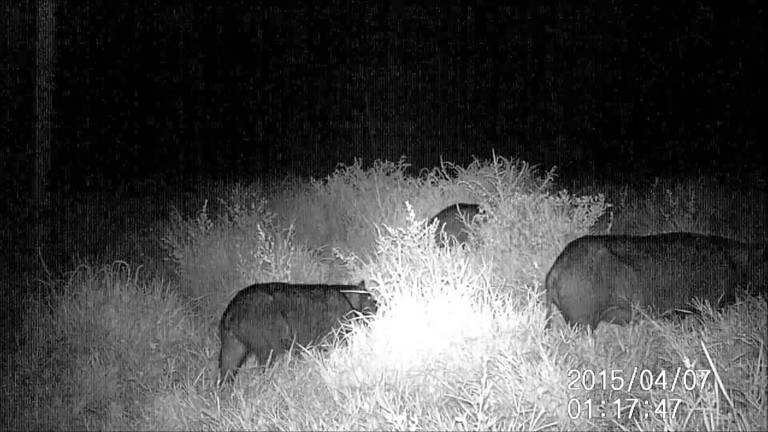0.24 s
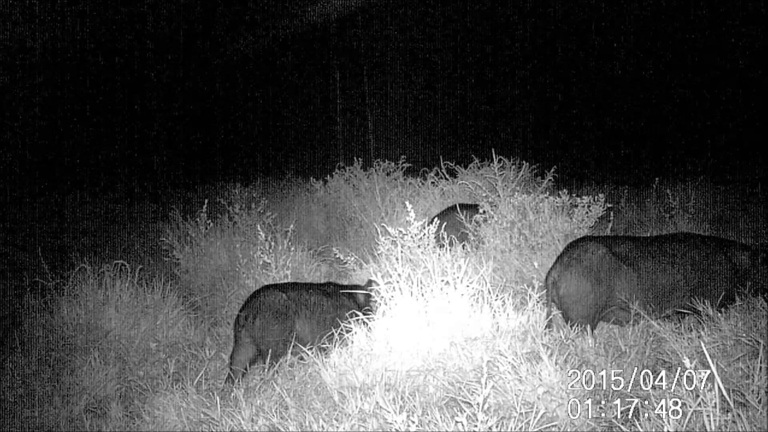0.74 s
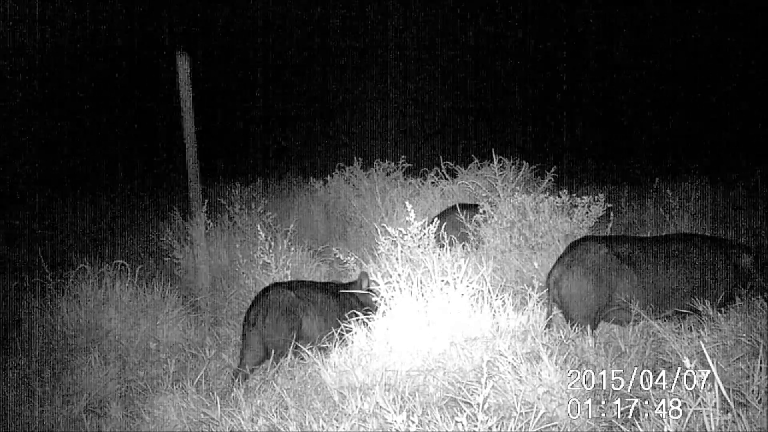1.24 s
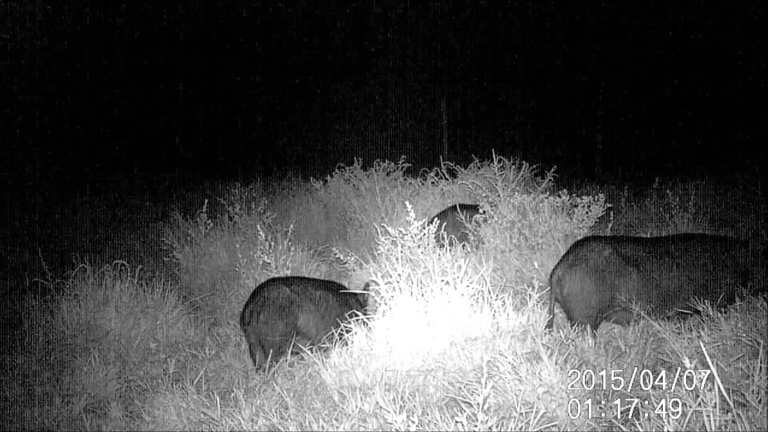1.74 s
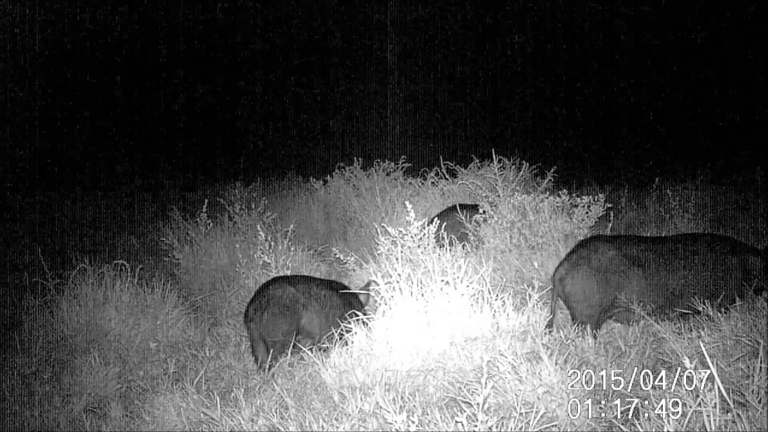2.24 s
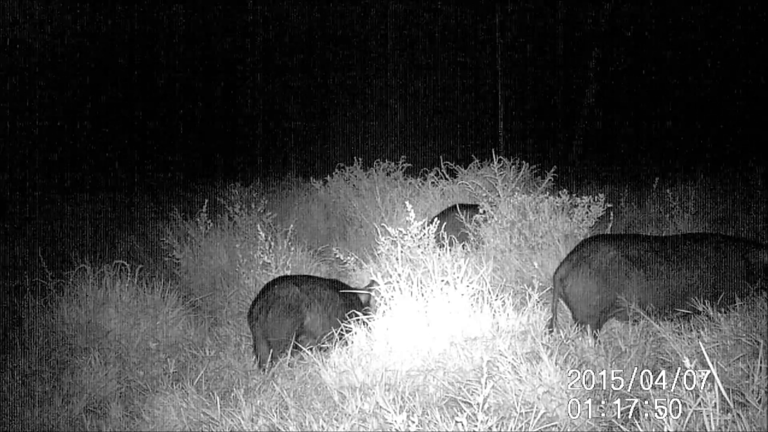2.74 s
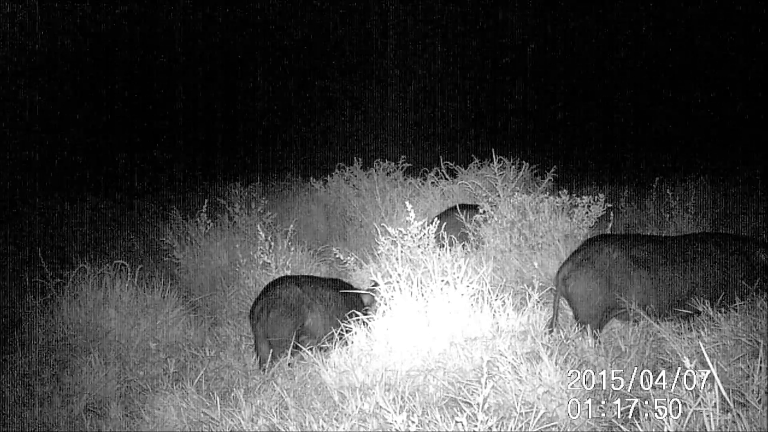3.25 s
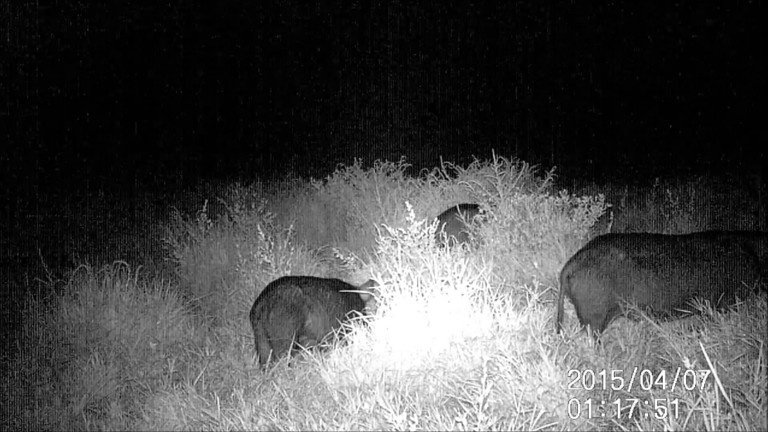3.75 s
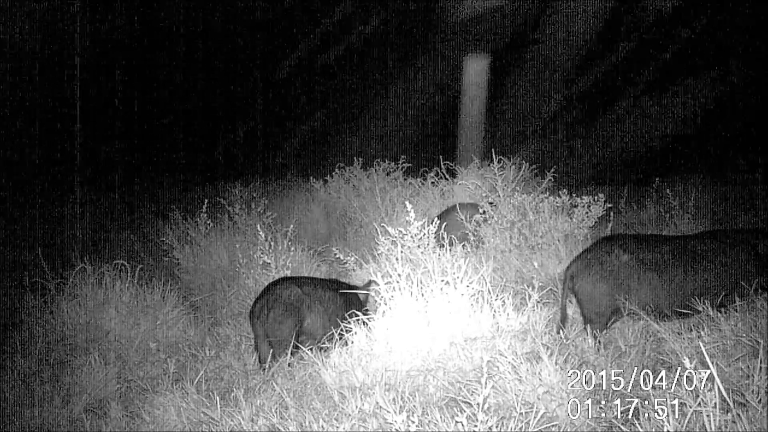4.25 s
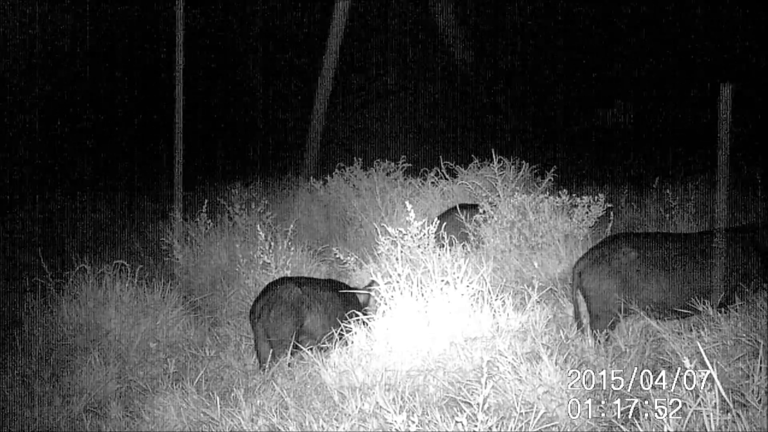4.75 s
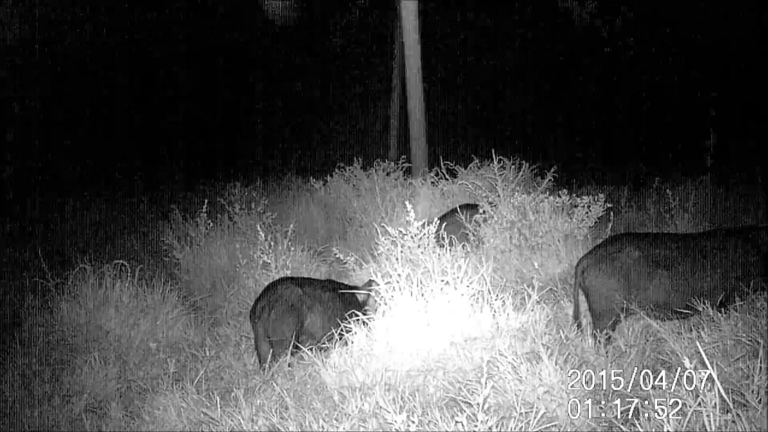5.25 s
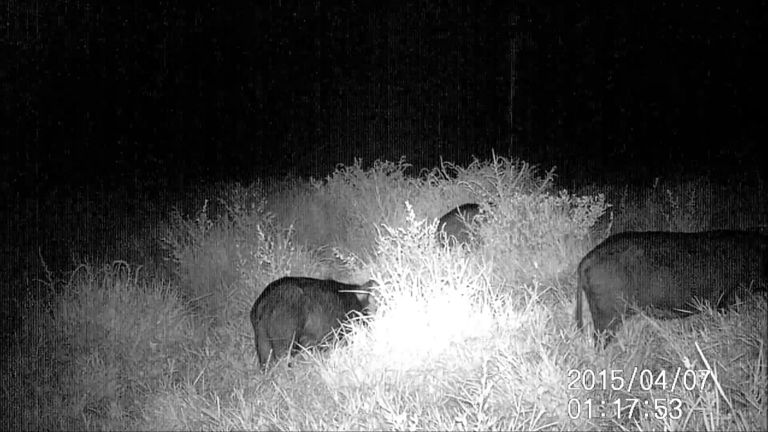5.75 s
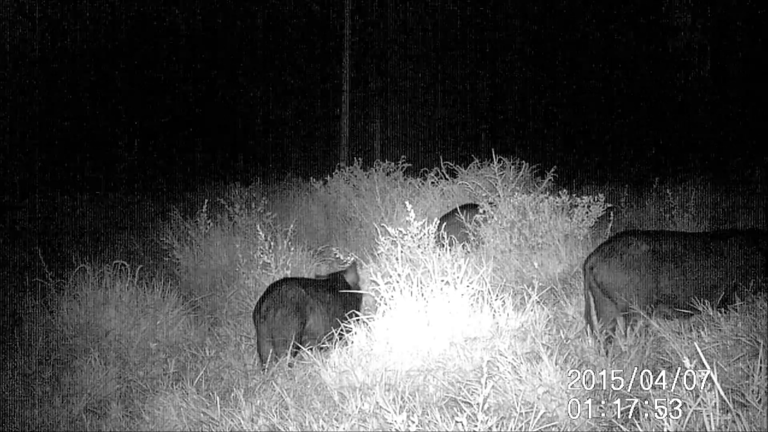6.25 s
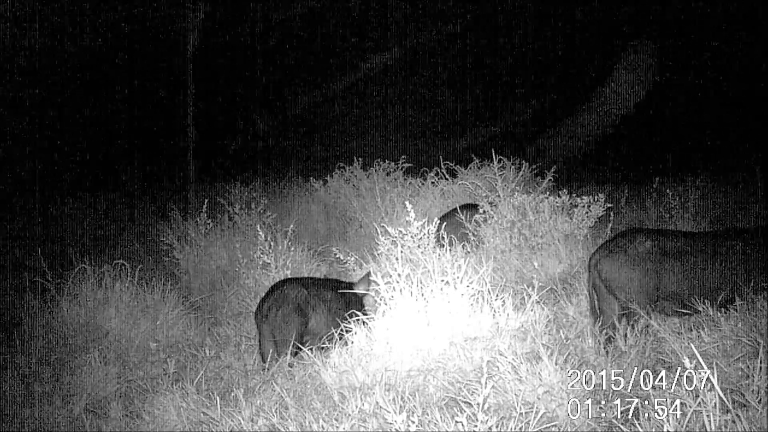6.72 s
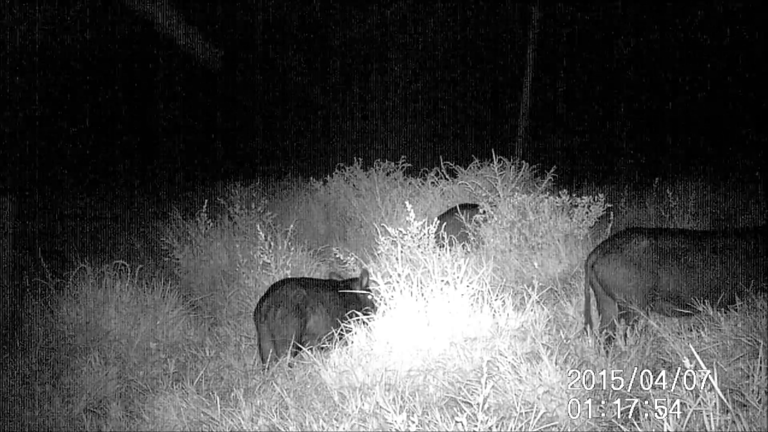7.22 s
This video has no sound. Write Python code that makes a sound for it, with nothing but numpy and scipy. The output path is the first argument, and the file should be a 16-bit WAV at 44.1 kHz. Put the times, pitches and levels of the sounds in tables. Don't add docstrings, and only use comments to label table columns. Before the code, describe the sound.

Rainy night in wet grass, heard through a small plastic housing with dull, narrow sound. Wind rumbles and rushes for 0.3 s, then a tiny silent gap and an abrupt change to a calmer scene. Soft rain hiss, faint plinks and high cricket trills around 3.5 kHz run throughout, the near cricket in short broken phrases. Stems snap and crunch in pigs' jaws, notably at 0.8, 2.3, 3.2, 3.6 and 5.3 s. Drops tick and knock on the shell, with heavy thumps at 1.24 and 1.54 s and a sharp tick at 3.83 s. A ragged 30 Hz buzz, light at first, gets clearly louder from 2.4 s and briefly stalls at about 3.7, 5.0 and 6.4 s. A big wet slap lands at 4.04 s amid crackling bites; a very hard hit comes at 6.43 s. Another firm drop follows at 7.3 s, then a faint bite.

```python
import sys
import numpy as np
from scipy import signal
from scipy.io import wavfile
from scipy.ndimage import uniform_filter1d

SR = 44100
rng = np.random.default_rng(int(sys.argv[2]) if len(sys.argv) > 2 else 0)


def generate_wav(sig):
    pcm = np.round(np.clip(np.atleast_2d(sig).T, -1, 1) * 32767).astype(np.int16)
    wavfile.write(sys.argv[1], SR, pcm)


def decibels_to_gain(level_db):
    exponent = np.asarray(level_db, float) / 20
    return 10 ** exponent


N = 329868

PORT_HZ = 3480


def in_time(rows):
    s, *columns = np.transpose(rows)
    return [np.interp(np.arange(N) / SR, s, c) for c in columns]


def rms_one(x):
    return x / np.sqrt(np.mean(x ** 2) + 1e-20)


def drift(rate_hz):
    r = np.exp(-80 * np.pi * rate_hz / SR)
    slow = signal.lfilter([1], [1, -2 * r, r * r], rng.standard_normal(N // 40 + 2002))[2000:]
    return np.interp(np.arange(N) / 40, np.arange(len(slow)), rms_one(slow))


def band(x, low_hz, high_hz):
    return signal.sosfilt(signal.butter(2, [low_hz, high_hz], "band", fs=SR, output="sos"), x)


def ring(clicks, hz, t60):
    r = decibels_to_gain(-60 / (t60 * SR))
    w = 2 * np.pi * hz / SR
    return signal.lfilter([0, np.sin(w)], [1, -2 * r * np.cos(w), r * r], clicks + 1e-18)


def add(out, s, piece):
    i = round(s * SR)
    out[i:i + len(piece)] += piece[:N - i]


def air():
    # [f/Hz, level per Hz/dB]
    colour = [(88, -38.5), (150, -12), (235, -5.5), (277, -3), (341, -8), (440, -7), (504, -8.5),
              (777, -12.5), (1670, -11.5), (2940, -9), (3570, -9), (3790, -8), (4150, -18.5), (5350, -32.5),
              (6960, -62), (11800, -120)]
    color_hz, color_db = np.transpose(colour)
    edges = 130 * 2 ** np.arange(0, 5.6, 1 / 3)
    together = drift(27)
    sizes = decibels_to_gain(2.3 * np.minimum(rng.exponential(1, N), 4))
    grains = (rng.random(N) < 260 / SR) * sizes * rng.choice([-1, 1], N)
    white = rng.standard_normal((2, N))
    out = 0
    for k, (low, high) in enumerate(zip(edges, edges[1:])):
        hz = np.sqrt(low * high)
        source = white[k % 2] + 0.77 * grains * min(hz / 2000, 1)
        level_db = np.interp(np.log(hz), np.log(color_hz), color_db)
        out = out + band(source, low, high) * decibels_to_gain(level_db + .6 * together + 1.2 * drift(15))
    return decibels_to_gain(-54) * rms_one(out)


def wind():
    # [t/s, level on the port/dB, level in the grass/dB]
    gusts = [
        (0, -49.5, -66),
        (.25, -48, -58),
        (.35, -66, -69),
        (.7, -66, -63),
        (1.2, -61, -71.5),
        (1.9, -65.5, -62.5),
        (2.4, -67, -74),
        (7.48, -61, -77),
    ]
    port_db, grass_db = in_time(gusts)
    rumble = band(rng.standard_normal(N), 14.0, 45)
    rush = band(rng.standard_normal(N), 460, 760)
    return decibels_to_gain(port_db) * rms_one(rumble) + decibels_to_gain(grass_db + 1.9 * drift(6.7)) * rms_one(rush)


def stalls(lead_s, width_s):
    first_s, every_s = 3.66, 1.36
    t = np.arange(N) / SR + lead_s - first_s
    since = t - every_s * np.maximum(np.round(t / every_s), 0)
    return np.exp(-(since / width_s) ** 4)


def buzz():
    # [t/s, frame sag level/dB]
    load = [
        (0, -65),
        (.1, -55.5),
        (1.05, -54),
        (1.16, -59),
        (2.27, -56.5),
        (2.4, -46.5),
        (7.48, -46.5),
    ]
    load_db, = in_time(load)
    stall_db = -13 * stalls(0, .049)
    busy_db = 4 * stalls(.1, .05)
    sag_db = load_db + stall_db
    stray_db = -56 + .6 * (load_db - load_db[-1] + stall_db) + busy_db
    frame_hz, frame_lead = 30.13, .02
    frame = (frame_hz * np.arange(N) / SR + frame_lead + 0.02 * drift(30)) % 1
    high = 1. * (frame < .63)
    strays_per_s = 40
    starts = 1. * (rng.random(N) < strays_per_s * decibels_to_gain(4 * drift(6)) / SR)
    pulses = np.minimum(uniform_filter1d(starts, size=160) * 160, 1)
    steps = pulses * (.6 - 1.62 * high)
    wave = decibels_to_gain(sag_db + 9) * (high - high.mean()) + decibels_to_gain(stray_db + 15) * (steps - steps.mean())
    return band(wave, 6.0, 320)


def patter():
    sizes = decibels_to_gain(3 * np.minimum(rng.exponential(1, N), 3)) * (rng.random(N) < 30 / SR)
    pitches = np.geomspace(1500, 2900, 8)
    dealt = rng.integers(0, 8, N)
    out = 0
    for k, hz in enumerate(pitches):
        out = out + ring(band(sizes * (dealt == k), hz, hz * 1.07), hz, 20.0 / hz)
    return decibels_to_gain(-56.5) * out


def strokes(times, levels_db, shift_hz):
    length_s, top_hz, fall_hz = .027, 3790, 360
    out, u = np.zeros(N), np.linspace(0, 1, round(length_s * SR))
    chances = rng.standard_normal((len(times), 4))
    for s, db, (late, tune, loud, turn) in zip(times, levels_db, chances):
        hz = top_hz + shift_hz + 30 * tune - fall_hz * u ** 1.5
        tone = np.sin(np.pi * u) ** 1.2 * np.sin(2 * np.pi * np.cumsum(hz) / SR + 10 * turn)
        add(out, max(s - length_s / 2 + .0015 * late, 0), decibels_to_gain(db + 0.63 * loud) * tone)
    return out * decibels_to_gain(2.0 * drift(100))


def crickets():
    # [t/s of the first, level/dB]
    leads = [
        (.358, -46),
        (2.1, -47),
        (4.081, -45),
        (5.963, -48.5),
    ]
    # [first stroke t/s, last stroke t/s]
    trills = [(.022, .168), (.533, .776), (.936, 1.071), (1.125, 1.401), (1.751, 1.781), (2.377, 2.595),
              (2.658, 2.797), (3.039, 3.321), (3.523, 3.869), (4.313, 4.697), (4.92, 5.305), (5.514, 5.757),
              (6.282, 6.385), (6.486, 6.591), (6.742, 7.065), (7.349, 7.453)]
    lead_gap_s, gap_s = .066, .0349
    rows = [(s + lead_gap_s * k, db) for s, db in leads for k in range(3)]
    for first, last in trills:
        count = round((last - first) / gap_s) + 1
        rows += [(s, -47.5) for s in np.linspace(first, last, count)]
    times, levels_db = np.transpose(rows)
    far = 0
    for k in range(-2, 3):
        far_times = np.arange(.007 * (k + 2), N / SR, gap_s * (1 + .035 * k))
        far = far + decibels_to_gain(2.0 * drift(3.1)) * strokes(far_times, 0 * far_times, 50 * k - 45)
    blur = band(rng.standard_normal(N), 3265, 3715)
    chorus = .66 * rms_one(far) + .66 * rms_one(blur)
    return strokes(times, levels_db + 2.9, 0) + decibels_to_gain(-51 + 1.0 * drift(3.0)) * chorus


def pushes():
    # [t/s, level/dB, width/ms]
    dents = [
        (1.2357, -22.5, 3.7),
        (1.5352, -26.5, 2.4),
        (3.939, -32, 1.6),
        (4.829, -26, 2.2),
        (6.142, -37.5, 1.8),
        (6.283, -32, 2.2),
    ]
    out, t = np.zeros(N), np.arange(1500) / SR
    for s, db, ms in dents:
        u = t * 1000 / ms - 1.5
        dent = -np.exp(-u ** 2 * 6)
        add(out, s - 0.001136 * ms, decibels_to_gain(db) * band(dent, 140, 660))
    return out


def knocks():
    # [t/s, level/dB, f/Hz]
    thuds = [(1.167, -46.5, 1040), (1.2355, -34, 573), (1.534, -27, 953), (2.8056, -32, 1270),
             (3.834, -46, 1310), (3.933, -52, 500), (4.034, -46, 977), (4.094, -37.5, 690),
             (6.141, -47, 484), (6.284, -41, 934), (6.312, -36.5, 1120), (6.4346, -35, 1000),
             (6.636, -45, 532), (7.32, -50, 450), (7.468, -41, 760)]
    out, t = np.zeros(N), np.arange(1200) / SR
    for s, db, hz in thuds:
        t60 = .018 * (hz / 1000) ** 2.5
        blow = np.exp(-t / 0.0001) + 0.082 * rng.standard_normal(len(t)) * np.exp(-t / 0.0015)
        sound = band(ring(blow, hz, max(t60, .003)) + 3 * blow, 260, 1800)
        add(out, s, decibels_to_gain(db) * sound / abs(sound).max())
    return out


def slap():
    # [f/Hz, level/dB, fade by 60 dB/s]
    shell = [(4030, 0.5, 0.0088), (4500, -6.5, 0.0095), (3330, -7.5, 0.0035), (3020, -33.5, 0.049),
             (2040, -18.5, 0.048), (1640, -39.5, 0.048), (2400, -32, 0.027)]
    out, t = np.zeros(N), np.arange(1500) / SR
    port = (3620, -4, .045)
    modes = sum(decibels_to_gain(db) * ring(1. * (t == 0), hz, t60) for hz, db, t60 in shell + [port])
    contact_s = .0064
    damped = modes * (.12 + .88 / (1 + (t / contact_s) ** 12))
    spatter = decibels_to_gain(-17) * rng.standard_normal(len(t)) * np.exp(-t / .005)
    sound = band(damped + spatter, 1800, 4900)
    add(out, 4.0437, -decibels_to_gain(2.5) * sound / sound[abs(sound).argmax()])
    return out


def crunches():
    # [t/s, length/s, level/dB, f/Hz]
    bites = [
        (0.787, 0.063, -40.5, 2140),
        (2.277, 0.026, -43, 1930),
        (3.202, 0.027, -46.5, 2170),
        (3.582, .06, -51, 1980),
        (3.8, 0.028, -46, 2500),
        (4.0273, 0.013, -32, 2900),
        (4.049, 0.0078, -35, 1690),
        (5.228, 0.042, -49.5, 1900),
        (7.432, 0.024, -50, 1930),
        (6.06, 0.022, -45, 1900),
    ]
    out, t = np.zeros(N), np.arange(4000) / SR
    for s, length, db, hz in bites:
        draw, size = rng.random(4000), rng.standard_normal(4000)
        swell = np.sin(np.pi * np.clip(t / length, 0, 1)) ** 2
        grains = size * (draw < 5000 / SR) * swell
        mouth = .7 * ring(grains, .84 * hz, .01) - ring(grains, hz, .012) + .7 * ring(grains, 1.17 * hz, .008)
        sound = band(mouth + .7 * ring(grains, PORT_HZ, .008), hz / 1.5, 4500)
        add(out, s, decibels_to_gain(db) * rms_one(sound) * np.sqrt(length * SR / 8000))
    return out


def contacts():
    # [t/s, port f/Hz, port level/dB, shell level/dB, crack level/dB]
    drops = [(1.161, 3460, -33, -33, -42), (1.2354, 3460, -23, -21.5, -28.5),
             (1.5352, 3740, -25, -20.5, -36), (1.6335, 3570, -24, -46, -37), (1.641, 3330, -31, -43, -43),
             (1.888, 3220, -28, -38, -34.5), (2.803, 3130, -24, -35, -37.5), (3.2784, 3700, -30, -36, -45),
             (3.8318, 3480, -17.5, -25.5, -22.5), (3.9324, 3430, -36.5, -45, -45),
             (4.0336, 3290, -33, -38, -47), (4.0831, 3500, -25, -45, -51), (4.0939, 3580, -23, -25, -39),
             (4.2381, 3540, -22, -35, -43), (4.8733, 3610, -26, -51, -50),
             (5.0043, 3760, -37.5, -48, -38.5), (5.2364, 3380, -31.5, -54, -42),
             (5.303, 3360, -25, -43, -41.5), (6.1409, 3440, -23.5, -31.5, -31.5),
             (6.2817, 3380, -21.5, -26, -40.5), (6.313, 3570, -31, -24, -33),
             (6.4343, 3400, -14.5, -20.5, -14.5), (6.6367, 3150, -28, -34.5, -42.5),
             (7.3184, 3320, -22.5, -23, -29.5)]
    # [t/s, stem f/Hz, stem level/dB, port level/dB]
    snaps = [(.2524, 2380, -44, -60), (.275, 2390, -44, -47), (0.8157, 1850, -27, -31),
             (0.8226, 2080, -28, -30), (.9033, 2220, -39.5, -41), (1.0112, 2050, -36.5, -50),
             (1.167, 2750, -36, -37), (1.899, 1530, -43.5, -39), (1.9683, 1870, -43.5, -42),
             (2.2841, 1860, -32.5, -30.5), (2.788, 2230, -37.5, -43), (2.8343, 2300, -38.5, -42),
             (2.8444, 1550, -33.5, -39), (3.148, 2690, -41, -44), (3.1987, 2700, -31.5, -39),
             (3.591, 2010, -32, -37), (3.6056, 2700, -35, -50), (3.82, 2720, -40, -56),
             (4.0243, 2570, -38, -34), (4.0887, 2620, -38, -31), (4.329, 1820, -43, -64),
             (4.6616, 2680, -41, -38), (5.253, 1700, -39, -41.5), (5.322, 2270, -40, -40),
             (5.3605, 2000, -32, -33), (5.7301, 1940, -36.5, -49), (5.906, 2350, -37, -45),
             (6.256, 2800, -37.5, -34), (6.268, 2650, -41.5, -54), (6.516, 1540, -42, -40.5)]
    # [t/s, port level/dB]
    drips = [(.1768, -33.5), (.6129, -39), (.7954, -32), (.835, -32.5), (.9953, -36), (1.2493, -39),
             (1.376, -39), (1.4782, -34), (2.2146, -37), (2.3541, -37), (2.6234, -37.5), (2.7948, -35),
             (2.822, -35), (3.0048, -36), (3.359, -41), (3.5973, -34), (3.619, -38), (3.6569, -34.5),
             (3.8027, -36), (5.1183, -38.5), (5.7256, -32.5), (6.0724, -31), (6.1986, -34.5), (6.4968, -39),
             (6.8387, -37.5), (6.9633, -39), (7.1934, -40.5)]
    wall_hz, drip_hz = 2580, 2100
    rows = [(s, hz, port_db, wall_hz, wall_db, crack_db) for s, hz, port_db, wall_db, crack_db in drops]
    for s, hz, db, port_db in snaps:
        rows.append((s, PORT_HZ + 120 * rng.normal(), port_db, hz, db, db - 18))
    for s, db in drips:
        port_hz = PORT_HZ + 120 * rng.normal()
        rows.append((s, port_hz, db, drip_hz * rng.uniform(.75, 1.25), db - 9.5, db - 16))
    return rows


def ticks():
    out, t = np.zeros(N), np.arange(1200) / SR
    spike = band(1. * (np.arange(len(t)) == round(.0004 * SR)), 1100, 5000)
    for s, port_hz, port_db, body_hz, body_db, crack_db in contacts():
        hard = np.clip((crack_db + 52) / 18, 0, 1)
        splatter_s = .0022 - .0013 * hard
        fade = .5 * np.exp(-t / splatter_s) + .04 * np.exp(-t / .004)
        blows = rng.standard_normal((3, len(t))) * fade
        blows[:, 0] = .3 + hard
        blows[0] += .24 * hard * np.roll(blows[0], round(.0045 * SR))
        port = band(ring(blows[0], port_hz, .0044) + 2.0 * blows[0], 2760, 3770)
        body = ring(blows[1], body_hz, 7.7 / body_hz) + 1.2 * blows[1]
        body = band(body, body_hz / 1.4, body_hz * 1.3)
        crack = band(blows[2], 3850, 4810)
        wide = band(blows[0], 1000, 2500)
        parts = [(decibels_to_gain(port_db), port),
                 (decibels_to_gain(body_db) * (1 - 0.32 * hard), body),
                 (decibels_to_gain(crack_db), crack),
                 (decibels_to_gain(body_db - 7.0) * hard, wide),
                 (decibels_to_gain(max(port_db, body_db) - 10) * hard, spike)]
        for gain, part in parts:
            add(out, s, gain * part / abs(part).max())
    return out


def scene():
    background = air() + wind() + buzz() + patter() + crickets()
    housing = pushes() + knocks() + slap()
    return (background + housing + crunches() + ticks())[None]


def top_cut(x):
    return signal.sosfilt(signal.butter(12, 16000, fs=SR, output="sos"), x)


def record(dry):
    narrow = signal.sosfilt(signal.cheby1(10, .5, 5186, fs=SR, output="sos"), dry)
    narrow = narrow + .0133
    t = np.arange(N) / SR
    mute_from_s, mute_to_s = .3058, .3126
    joined = narrow * ((t < mute_from_s) | (t > mute_to_s))
    mix = np.clip(joined, -.97, .97)
    return top_cut(mix)


dry = scene()
out = record(dry)
generate_wav(out)
```